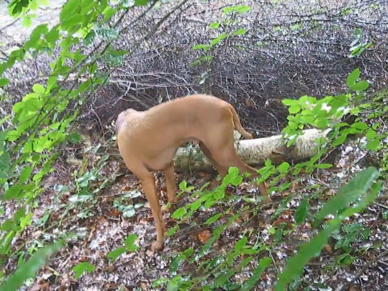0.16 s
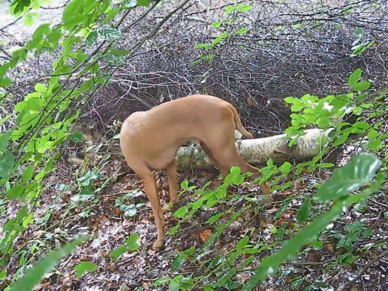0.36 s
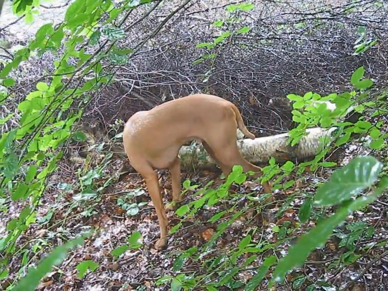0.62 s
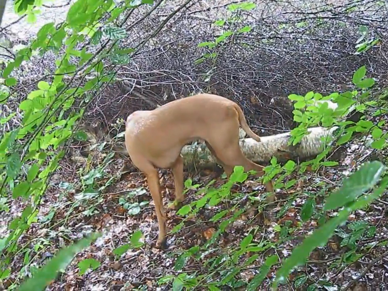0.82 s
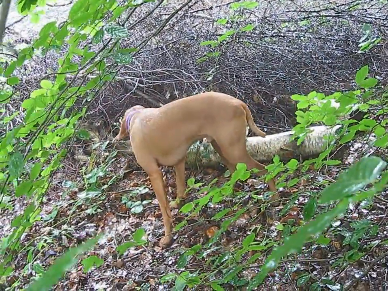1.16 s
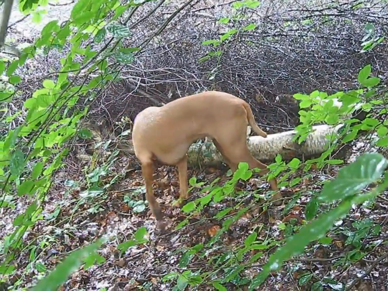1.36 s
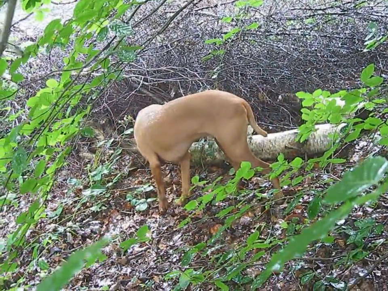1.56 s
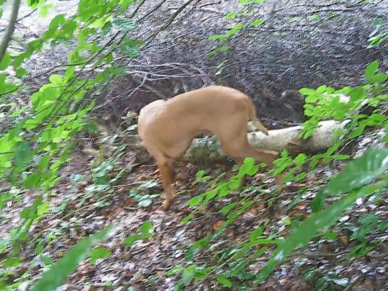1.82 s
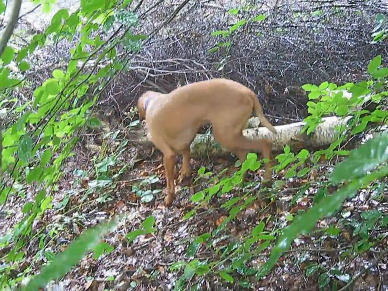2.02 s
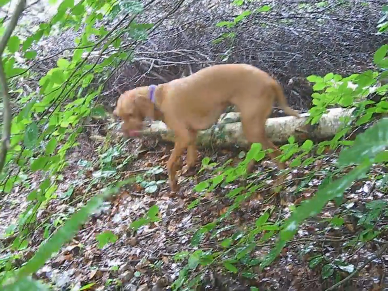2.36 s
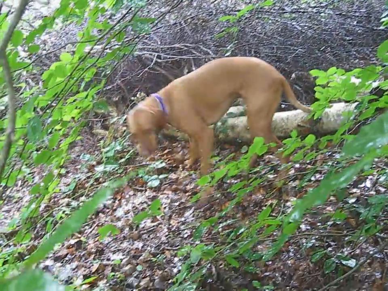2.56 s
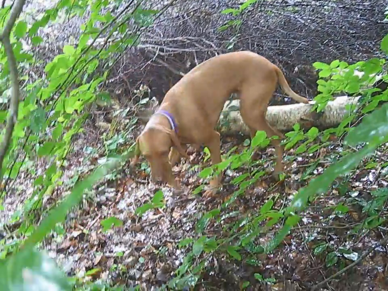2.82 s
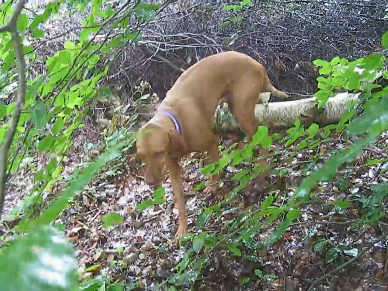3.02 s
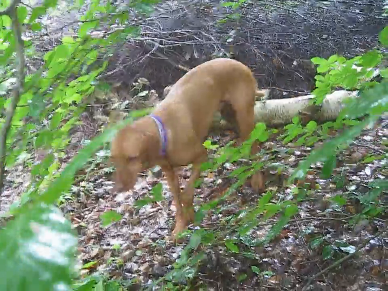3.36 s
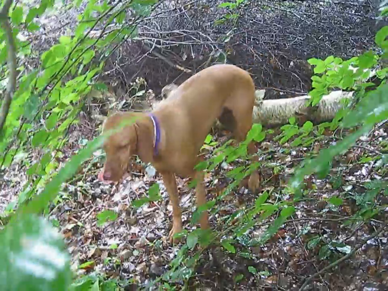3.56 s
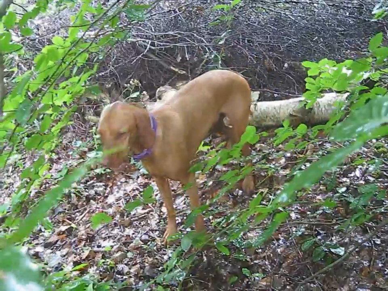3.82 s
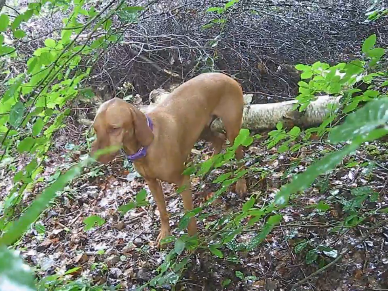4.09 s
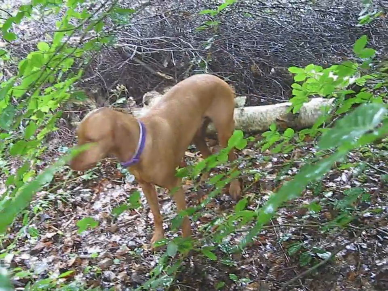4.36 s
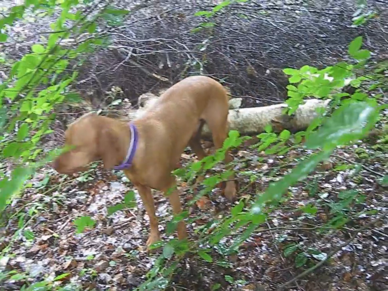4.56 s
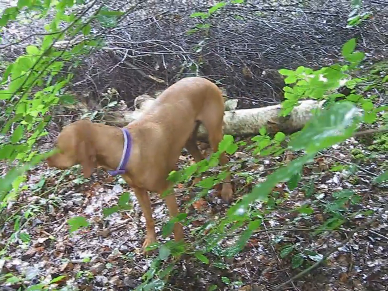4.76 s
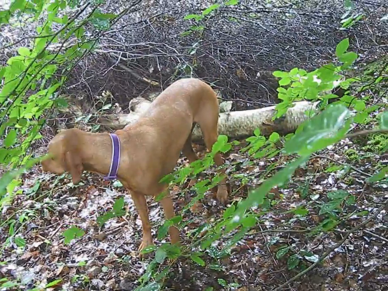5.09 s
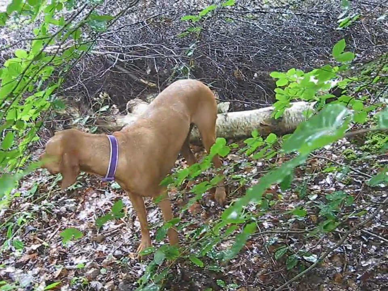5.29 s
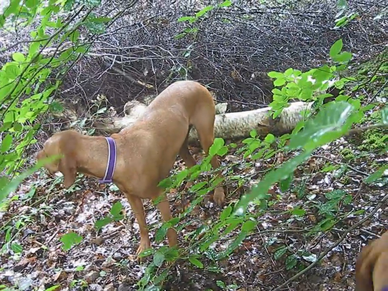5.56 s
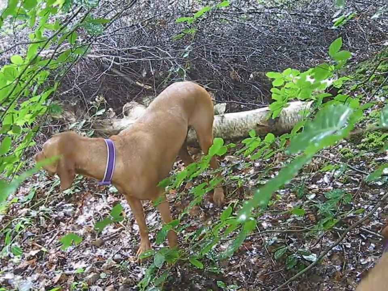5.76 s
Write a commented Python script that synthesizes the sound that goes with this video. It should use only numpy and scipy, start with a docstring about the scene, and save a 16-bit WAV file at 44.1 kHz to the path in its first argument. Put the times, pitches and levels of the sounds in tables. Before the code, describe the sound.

Steady rain falls on woodland leaves and leaf litter, a bright, dense, even hiss full of fine pattering. Close drops tick and snap at random; the loudest smacks come near 2.5 and 5.3 seconds. A soft low thud just precedes the first, and a dog's paws rustle faintly around 3.6. Outdoors, centred, with the microphone among the foliage.

```python
"""A wood in steady rain. Far drops, each a tiny burst of noise, merge into a wash; closer ones ring on leaves
and tick on leaf litter. Single near drops range from faint spray ticks to loud smacks: a short ring, a noise
burst, spray and a push of air. A dog shifts its paws once, a grainy rustle; a soft low drop knock and one
deeper thud are single low pulses. A low rumble lies underneath. Gain control ducks the loudest peaks and a
limiter flattens them. Both channels are the same."""
import sys
import numpy as np
from scipy import signal
from scipy.fft import rfft, irfft, next_fast_len
from scipy.io import wavfile
from scipy.ndimage import map_coordinates

SR = 44100
rng = np.random.default_rng(int(sys.argv[2]) if len(sys.argv) > 2 else 0)


def master_out(mix):
    """Clip the mix to full scale and print it as 16-bit PCM to the path in sys.argv[1]."""
    frames = np.transpose(np.atleast_2d(mix))
    ceiling = np.clip(frames, -1, 1)
    pcm = np.round(ceiling * 32767).astype(np.int16)
    wavfile.write(sys.argv[1], SR, pcm)


N = 260631  # length [samples]

# single near drops, from faint spray ticks to loud smacks:
# (time [s], relative tap level [dB], leaf pitch [Hz], relative spray level [dB])
NEAR_DROPS = [(0.6023, -29, 2900, -19), (0.981, -12.5, 3400, -28), (1.201, -11, 3700, -33),
              (1.273, -20, 4640, -15.5), (1.4952, -12, 3500, -18), (1.6632, -11.5, 2850, -33),
              (1.8906, -8.5, 4400, -30), (2.0327, -24, 3480, -17), (2.4654, 0, 3680, -2),
              (3.4223, -9, 2730, -18), (4.6753, -10, 3300, -38), (4.8006, -10.5, 3000, -33),
              (4.9212, -12.5, 1820, -33), (5.3142, -11.5, 3450, -25), (5.3304, -2, 3840, -19),
              (5.3334, -11, 3500, -32), (5.5634, -5, 2320, -17)]
# colour of the far rain all through the wood: (frequency [Hz], relative density [dB per Hz])
WASH_COLOUR = [(100, -29.5), (240, -14), (450, -10.5), (780, -4), (1350, -5), (2000, -2.5), (2800, 0),
               (4200, -2), (6000, -7), (8000, -11.5), (10000, -14), (13000, -19), (15800, -24)]
# filter for the taps on nearby leaves: (frequency [Hz], relative gain [dB])
TAP_COLOUR = [(100, -28), (700, -4.5), (2500, 1.5), (5000, 2), (10000, -3.5), (15800, -3)]
# colour of the fine spray ticking on leaf litter: (frequency [Hz], relative density [dB per Hz])
SPRAY_COLOUR = [(800, -33), (3000, -0.5), (6000, 0), (10000, -1), (13000, -4), (15800, -4.5)]
# a soft low drop knock and one deeper thud: (time [s], relative level [dB], pitch [Hz])
KNOCK_AND_THUD = [(2.306, -20, 340), (2.435, -10.5, 136)]
# a dog shifts its paws in damp litter: (time [s], level [dB], centre frequency [Hz], Gaussian half length [s])
PAW_SHUFFLES = [(3.606, -28.5, 1010, 0.049)]
# colour of the low outdoor rumble: (frequency [Hz], relative density [dB per Hz])
RUMBLE_COLOUR = [(12, -25), (25, -15), (35, -11), (60, 3.5), (112, 3), (170, -2.5), (250, -19),
                 (500, -21.5)]

# the rain layers are set against RAIN_DB; they start BUILD_DB softer and rise with time constant BUILD_S
RAIN_DB, BUILD_DB, BUILD_S = -20, 0.6, 0.86
# random drips: mean and scatter of their relative tap level, leaf pitch and relative spray level
DRIP_DB, DRIP_SPREAD_DB = -14.5, 2
LEAF_HZ, LEAF_SPREAD_OCTAVES = 3270, 0.36
DRIP_SPRAY_DB, SPRAY_SPREAD_DB = -23.5, 3.5
TOP_HZ = 15900  # nothing is kept from here up


def amp(db):
    """Decibels to gain."""
    return 10 ** (np.asarray(db) / 20)


def unit(x):
    """Scale to rms 1."""
    return x / np.sqrt(np.mean(x ** 2) + 1e-20)


def wobble(rate):
    """A smooth random curve, rate knots a second."""
    knots = rng.standard_normal(int(N * rate / SR) + 4)
    return map_coordinates(knots, [np.arange(N) * rate / SR])


def coloured(x, points):
    """Filter x causally (minimum phase) to follow (frequency [Hz], gain [dB]) points, at rms 1."""
    size = 2 * next_fast_len(N // 2 + 4096)
    hz, db = np.transpose(points)
    gain = amp(np.interp(np.log(np.fft.rfftfreq(size, 1 / SR) + 1), np.log(hz), db))
    # folding the cepstrum forward in time gives the minimum phase
    cepstrum = irfft(np.log(gain))
    cepstrum[1:size // 2] *= 2
    cepstrum[size // 2 + 1:] = 0
    response = np.exp(rfft(cepstrum))
    return unit(irfft(rfft(x, size) * response, size)[:N])


def rain():
    """Far wash, nearer taps and fine spray; the leaves shed their water in uneven flurries."""
    level_db = RAIN_DB - BUILD_DB * np.exp(-np.arange(N) / SR / BUILD_S)
    flurry = wobble(rate=14)
    wash = coloured(shower(rate=9000, spread_db=0.0, life=0.0061), WASH_COLOUR)
    taps = leaf_taps(count=5000, hz=3120, spread_octaves=0.52, spread_db=4.0, cycles=9.9)
    taps = coloured(taps, TAP_COLOUR)
    spray = coloured(shower(rate=900, spread_db=4, life=0.01), SPRAY_COLOUR)
    wash_db = level_db + 0.26 + 0.29 * flurry
    taps_db = level_db - 8.5 + 0.5 * flurry
    spray_db = level_db - 10.5 + 0.7 * flurry + 0.59 * wobble(rate=34)
    return amp(wash_db) * wash + amp(taps_db) * taps + amp(spray_db) * spray


def shower(rate, spread_db, life):
    """Drops at random moments, rate a second, of log-normal size; each a noise burst with t60 = life [s]."""
    falls = rng.random(N) < rate / SR
    # the biggest drops are rare; size is capped two spreads up
    size = amp(spread_db * np.minimum(rng.standard_normal(N), 2))
    keep = amp(-60 / (life * SR)) ** 2  # power kept per sample
    power = signal.lfilter([1], [1, -keep], falls * size ** 2)
    return np.sqrt(power) * rng.standard_normal(N)


def leaf_taps(count, hz, spread_octaves, spread_db, cycles):
    """Drops on leaves of many sizes: each rings for a few cycles (t60) at its own pitch."""
    start = rng.integers(0, N, (count, 1))
    pitch, size, side = rng.standard_normal((count, 3)).T[..., None]
    n = np.arange(SR // 150)
    leaf_hz = np.minimum(hz * 2 ** (spread_octaves * pitch), SR / 3)
    turns = leaf_hz * n / SR
    # the sign: a leaf is heard from above or below
    strength = np.sign(side) * amp(spread_db * np.minimum(size, 2))
    rings = strength * np.sin(2 * np.pi * turns) * amp(-60 * turns / cycles)
    return np.bincount((start + n).ravel(), rings.ravel(), N)[:N]


def leaf_hits(rows, life):
    """A wet leaf rings in two modes and nudges the air while the drop smacks and bursts into spray."""
    out, t = np.zeros(N + SR), np.arange(SR // 40) / SR
    for s, tap_db, hz, spray_db in rows:
        modes = np.sin(2 * np.pi * hz * t) + amp(-4) * np.sin(2 * np.pi * 1.4 * hz * t)
        envelope = amp(-60 * t / life) * (1 - np.exp(-t / 0.0003))
        ring = amp(tap_db + 9) * modes * envelope
        smack = amp(tap_db - 4.0) * burst(t, hz, width_hz=4500, life=life)
        spray = amp(spray_db - 1.5) * burst(t, hz=8300, width_hz=5500, life=life)
        # harder taps move more of the leaf, so the nudge grows faster than the tap
        nudge = amp(1.56 * tap_db - 1.0) * t / 0.00065 * np.exp(-t / 0.00039)
        out[round(s * SR):][:len(t)] += ring + smack + spray - nudge
    return out[:N]


def burst(t, hz, width_hz, life):
    """Noise in one steep resonance, struck and dying with t60 = life [s]; rms 1 over its first 2 ms."""
    f = np.fft.rfftfreq(len(t), 1 / SR)
    resonance = 1j * f * width_hz / (hz ** 2 - f ** 2 + 1j * f * width_hz)
    noise = irfft(rfft(rng.standard_normal(len(t))) * resonance ** 2, len(t))
    x = noise * amp(-60 * t / life) * (1 - np.exp(-t / 0.0004))
    return x / np.sqrt(np.mean(x[:SR // 500] ** 2))


def drips(count):
    """Drips at random times, in NEAR_DROPS columns; tap, pitch and spray vary independently."""
    s = rng.random(count) * N / SR
    tap, pitch, spray = np.clip(rng.standard_normal((count, 3)), -2, 2).T
    tap_db = DRIP_DB + DRIP_SPREAD_DB * tap
    hz = LEAF_HZ * 2 ** (LEAF_SPREAD_OCTAVES * pitch)
    spray_db = DRIP_SPRAY_DB + SPRAY_SPREAD_DB * spray
    return list(zip(s, tap_db, hz, spray_db))


def shuffles():
    """Wet leaves give under a paw with a dull, grainy rustle: a band of noise grains that swells and fades."""
    out, t = np.zeros(N), np.arange(N) / SR
    for s, db, hz, half in PAW_SHUFFLES:
        colour = [(hz / 4, -24), (hz, 0), (hz * 4, -22), (hz * 10, -45)]
        rustle = coloured(shower(rate=450, spread_db=3, life=0.01), colour)
        out += amp(db) * np.exp(-((t - s) / half) ** 2 / 2) * rustle
    return out


def knock_and_thud():
    """A soft low drop knock and one deeper thud: each is a single low pulse, one smooth swing down and back up."""
    out = np.zeros(N)
    for s, db, hz in KNOCK_AND_THUD:
        phase = 2 * np.pi * hz * (np.arange(N) / SR - s)
        out += amp(db) * phase * np.exp(-phase ** 2 / 2)
    return out


def rumble():
    """The dull background of the open air: low noise whose level wavers slightly."""
    level_db = -48.0 + 1.2 * wobble(rate=4.24)
    return amp(level_db) * coloured(rng.standard_normal(N), RUMBLE_COLOUR)


def scene():
    """Everything reaches one microphone; the random drips die away faster than the single near drops."""
    near = leaf_hits(NEAR_DROPS, life=0.0062)
    random_drips = leaf_hits(drips(count=36), life=0.0036)
    mono = rain() + near + random_drips + shuffles() + knock_and_thud() + rumble()
    return np.tile(mono, (2, 1))


def ducked(x, threshold_db, recovery_db_per_s, attack):
    """Gain control: a peak over the threshold pulls the gain down, and it climbs back at a steady rate."""
    over_db = np.maximum(20 * np.log10(np.abs(x).max(axis=0) + 1e-9) - threshold_db, 0)
    climb_db = recovery_db_per_s * np.arange(N) / SR
    cut_db = np.maximum.accumulate(over_db + climb_db) - climb_db
    # smoothing the cut lets the first instant of a peak slip past
    keep = np.exp(-1 / (attack * SR))
    smooth_cut_db = signal.lfilter([1 - keep], [1, -keep], cut_db)
    return x * amp(-smooth_cut_db)


def record(dry):
    """Gain control, rounded clipping of the peaks that slip past it, a treble roll-off and the band limit."""
    x = ducked(dry, threshold_db=3.5, recovery_db_per_s=125, attack=0.0014)
    x = x / (1 + np.abs(x / 0.9) ** 8) ** (1 / 8)  # peaks flatten towards 0.9
    size = next_fast_len(N + 4096)
    hz = np.fft.rfftfreq(size, 1 / SR)
    roll_off = 1 / np.sqrt(1 + (hz / 13800) ** 14)
    return irfft(rfft(x, size) * roll_off * (hz < TOP_HZ), size)[:, :N]


dry = scene()
out = record(dry)
master_out(out)
```